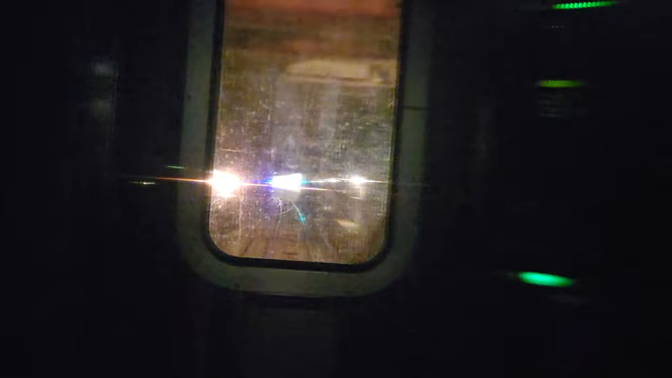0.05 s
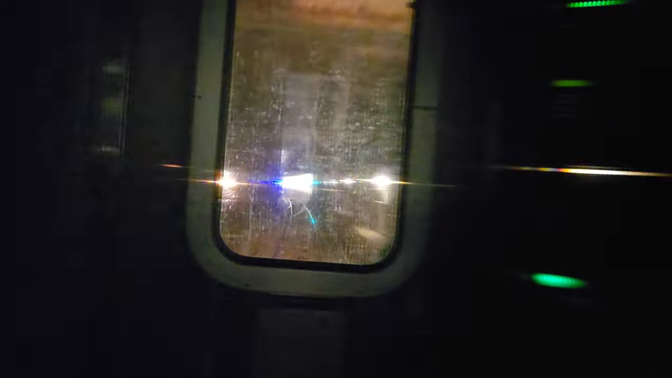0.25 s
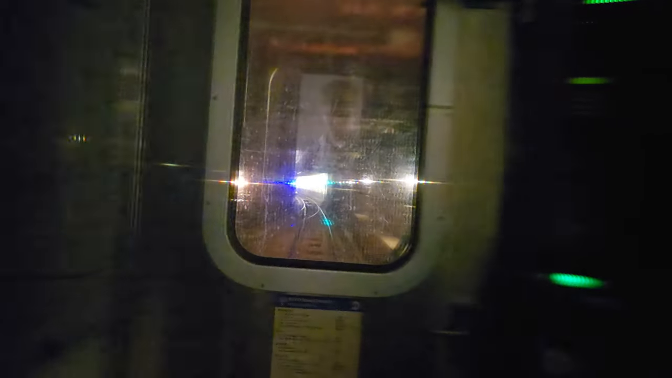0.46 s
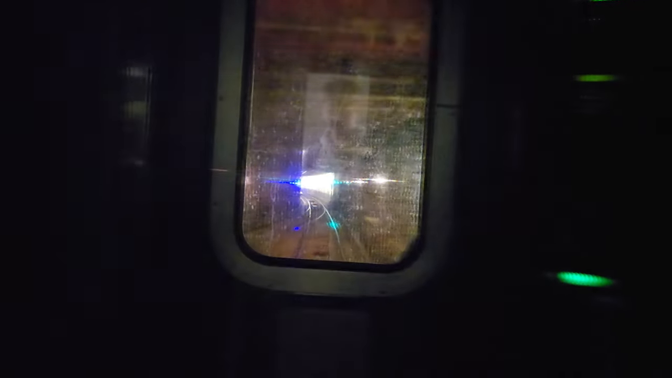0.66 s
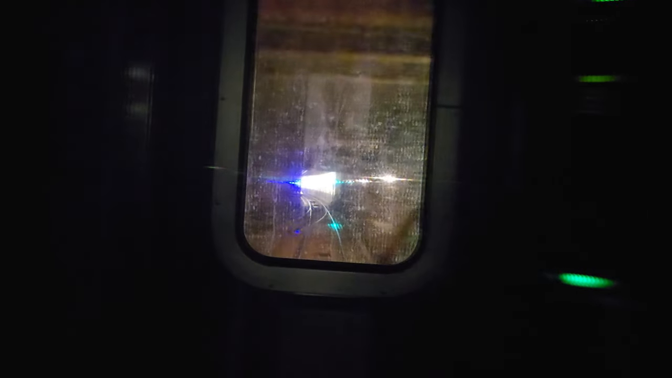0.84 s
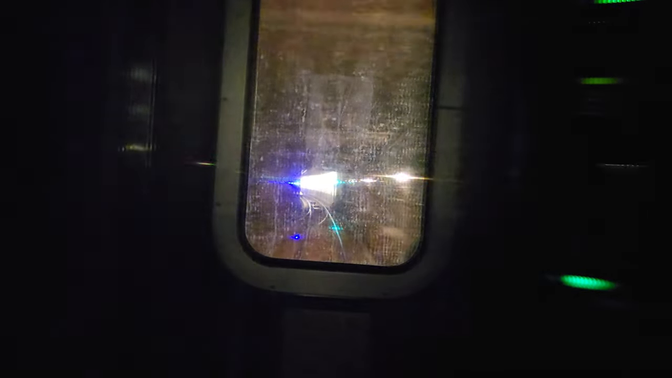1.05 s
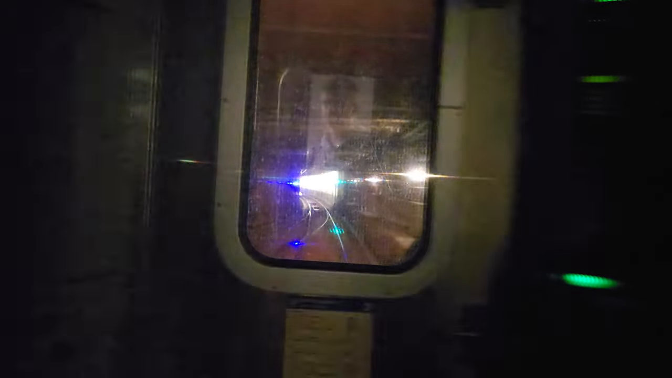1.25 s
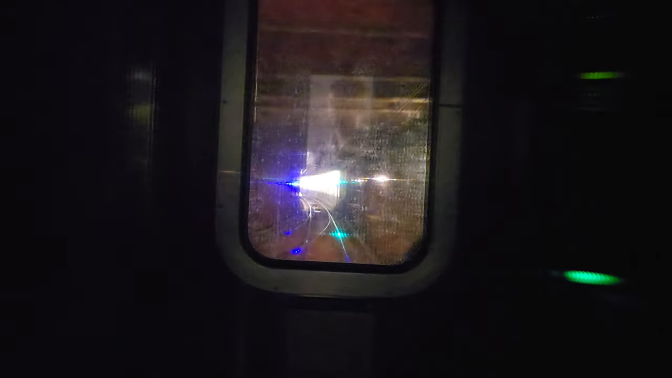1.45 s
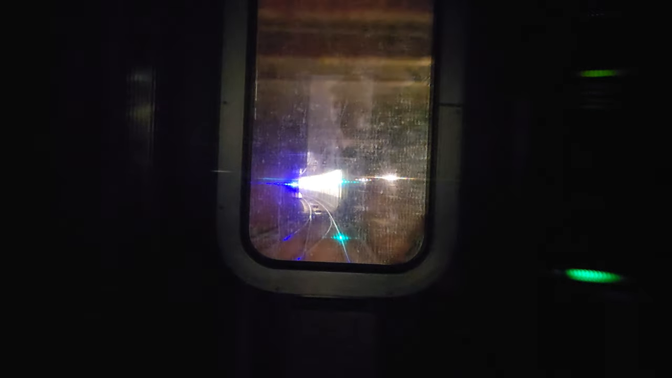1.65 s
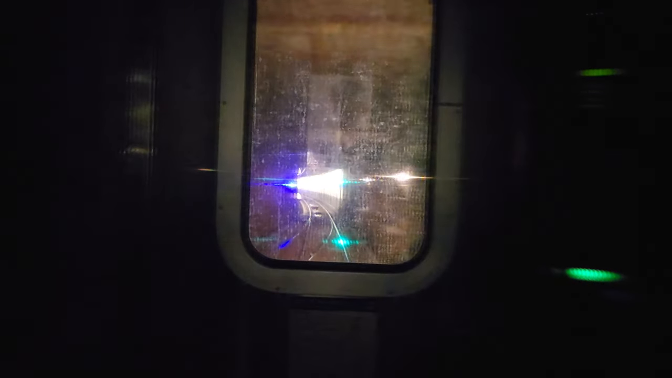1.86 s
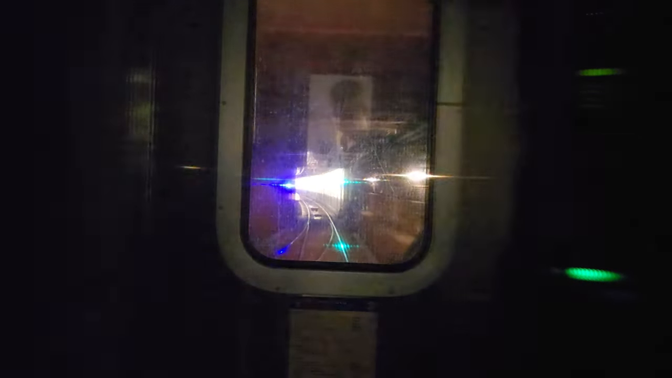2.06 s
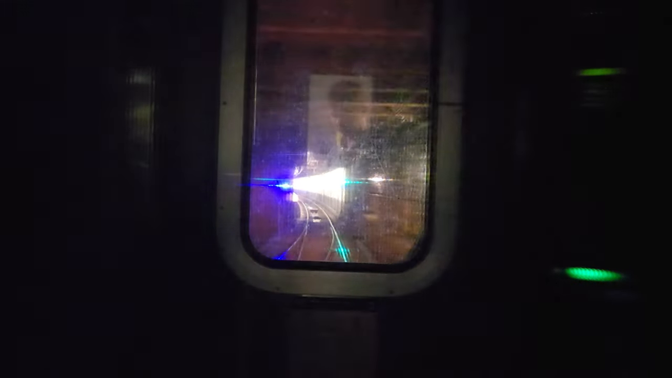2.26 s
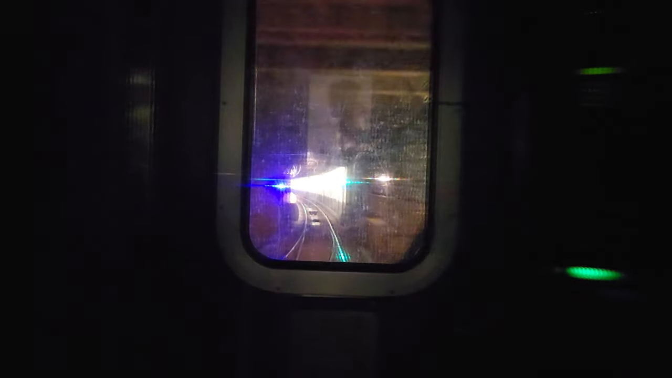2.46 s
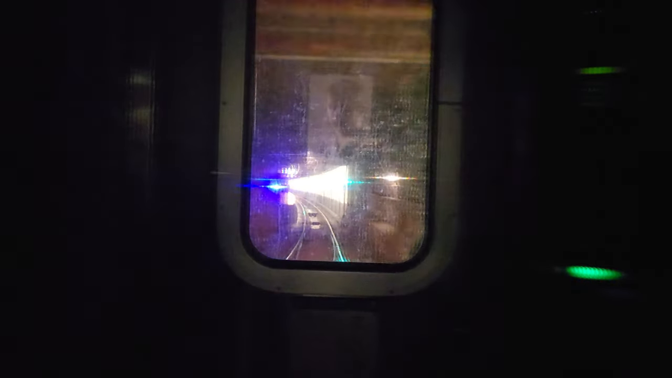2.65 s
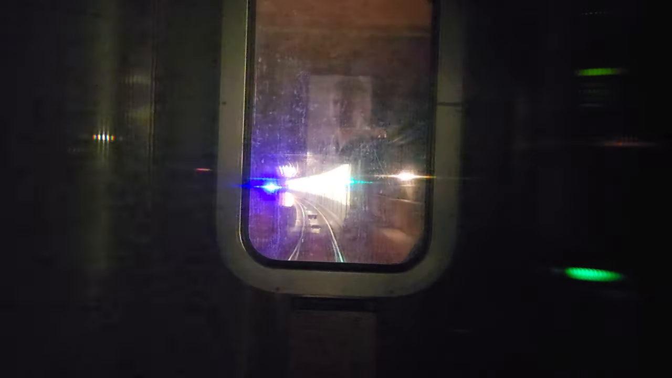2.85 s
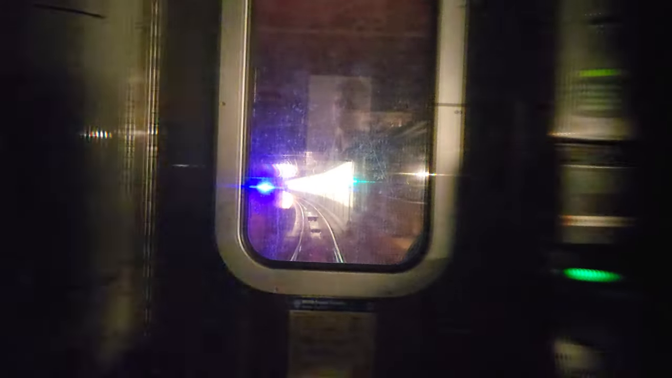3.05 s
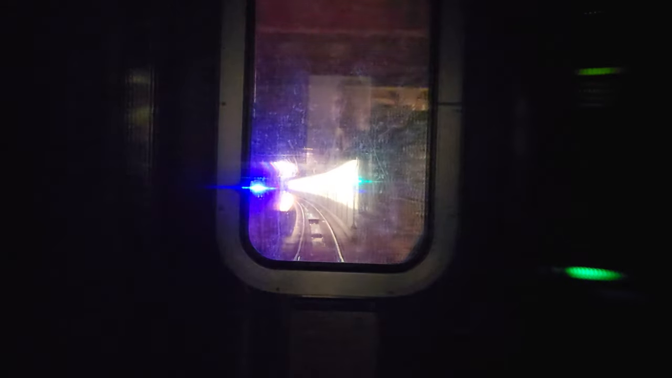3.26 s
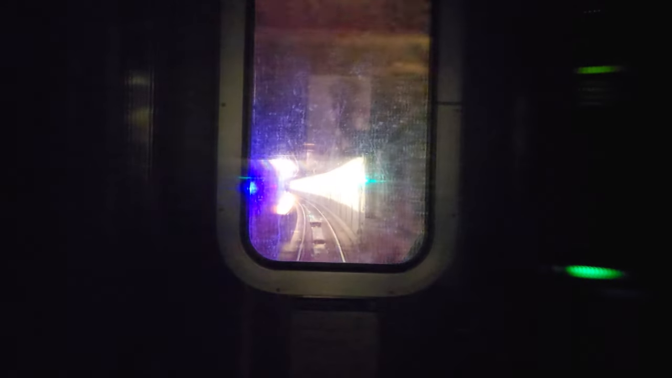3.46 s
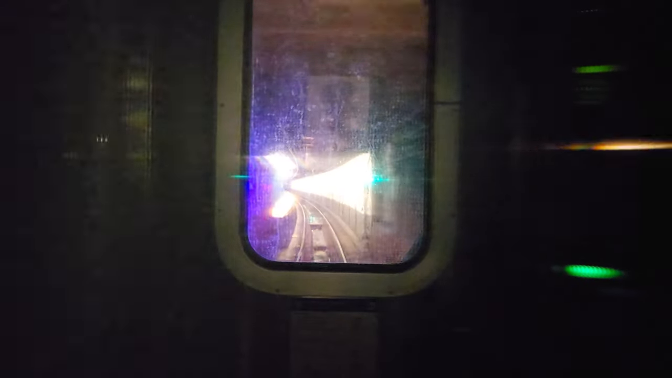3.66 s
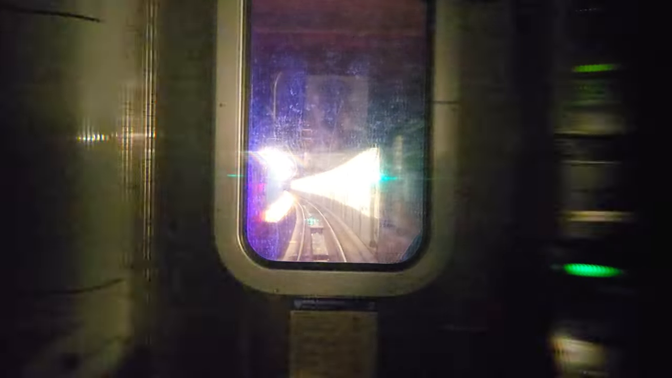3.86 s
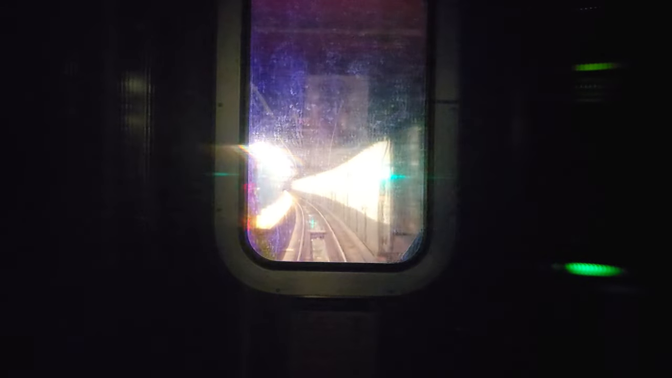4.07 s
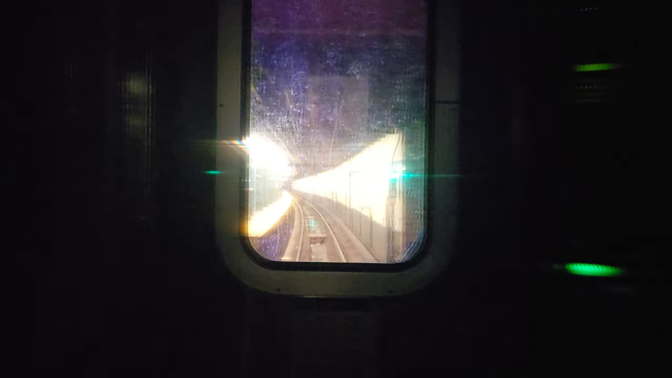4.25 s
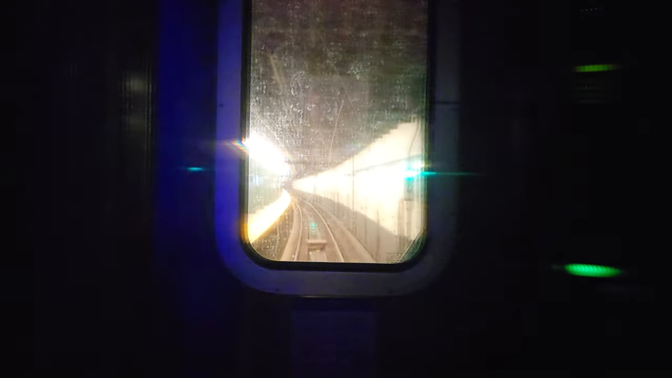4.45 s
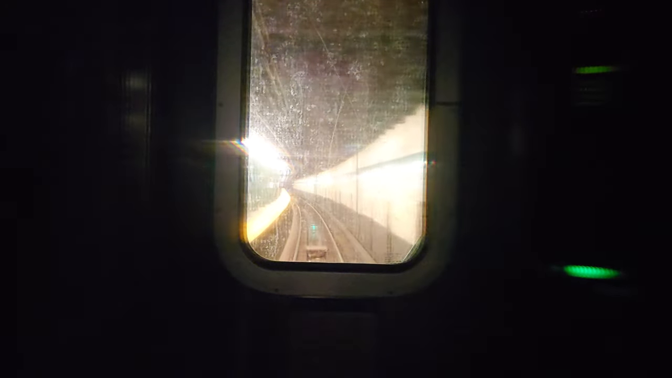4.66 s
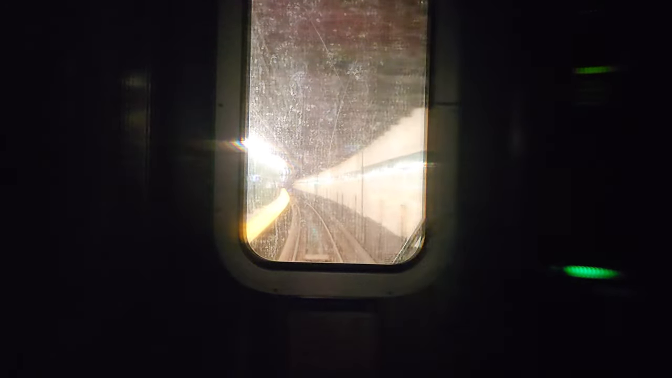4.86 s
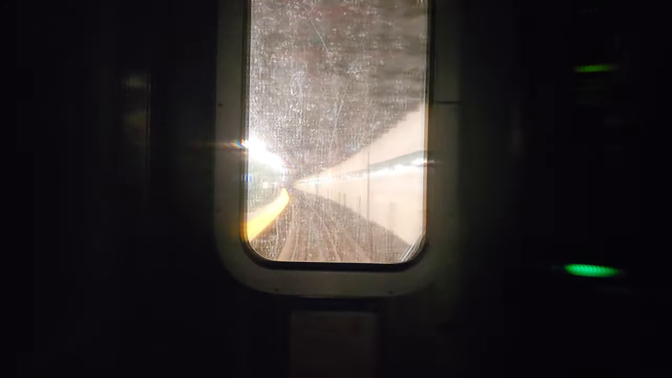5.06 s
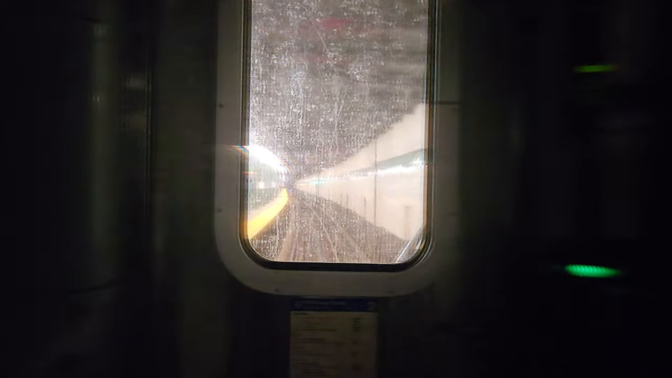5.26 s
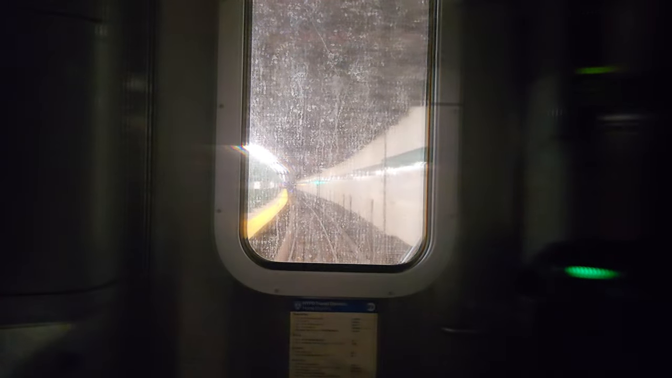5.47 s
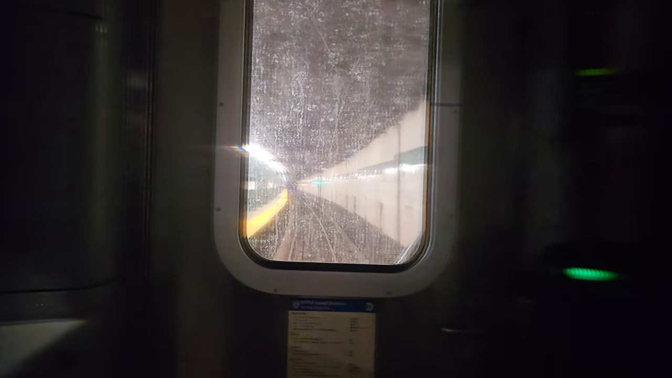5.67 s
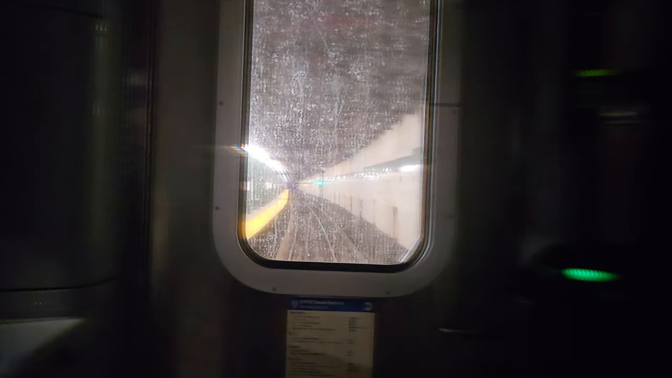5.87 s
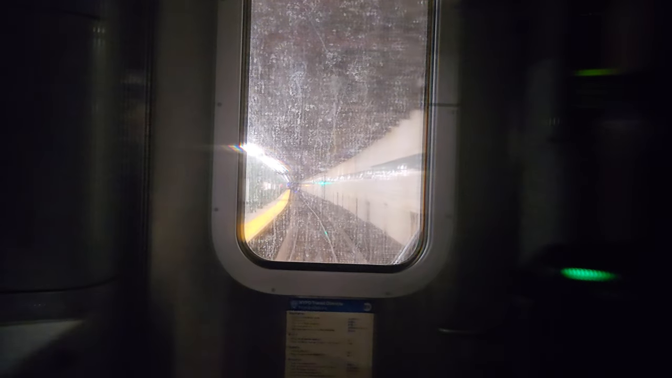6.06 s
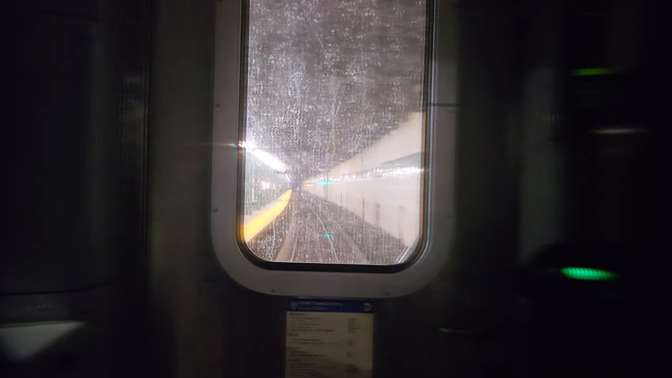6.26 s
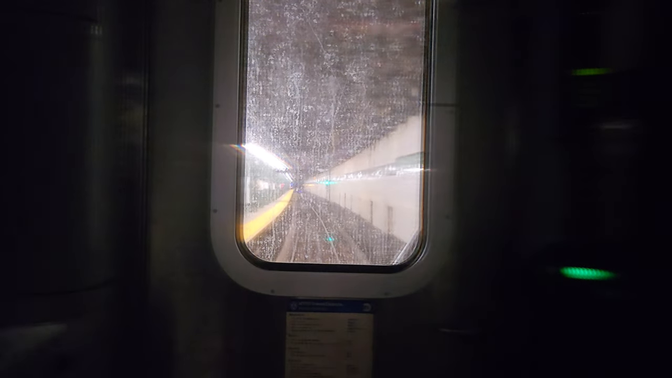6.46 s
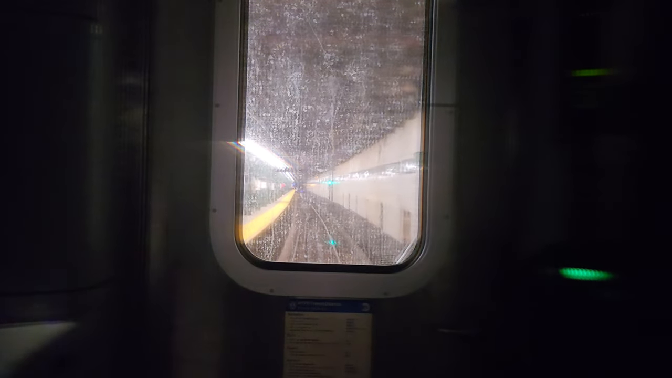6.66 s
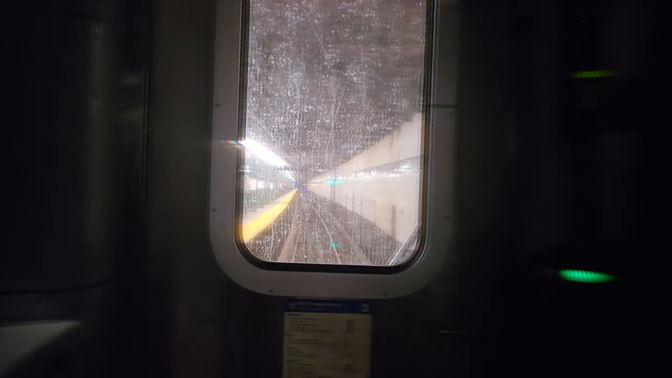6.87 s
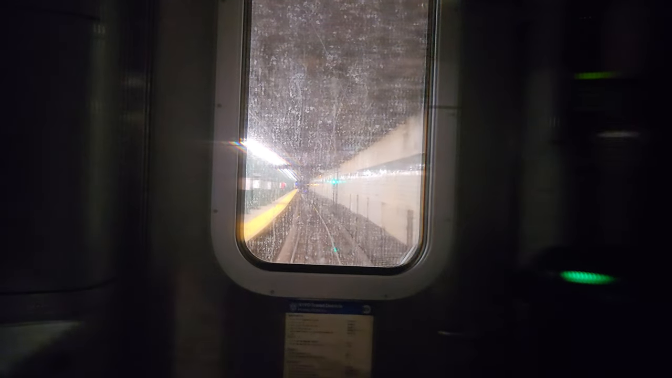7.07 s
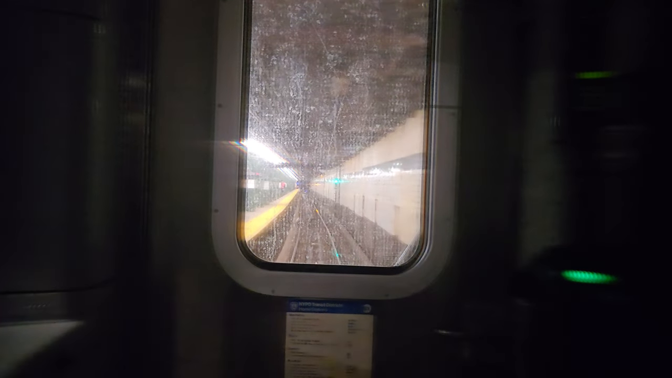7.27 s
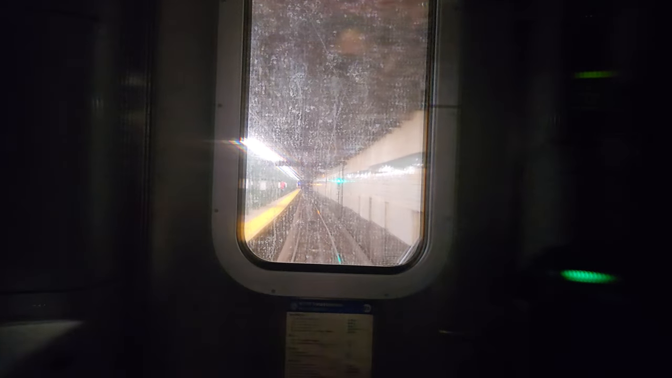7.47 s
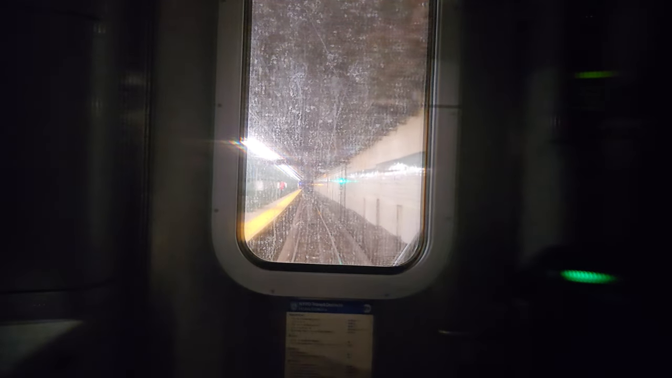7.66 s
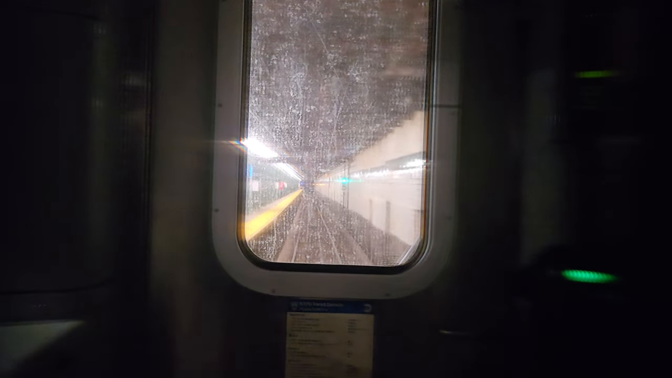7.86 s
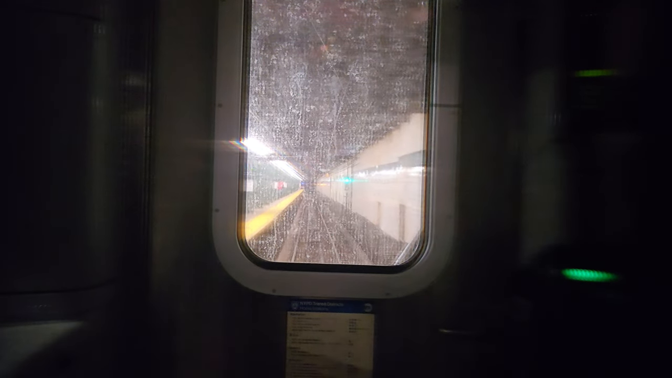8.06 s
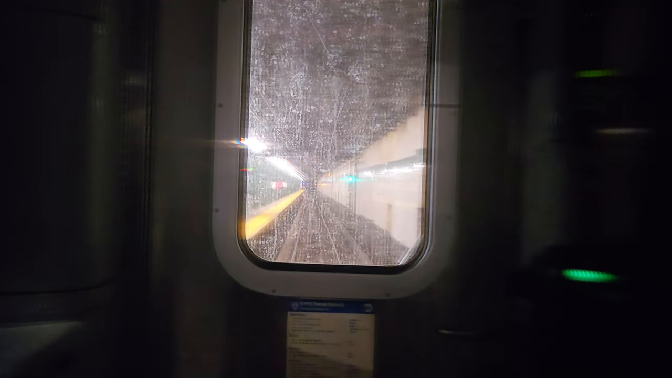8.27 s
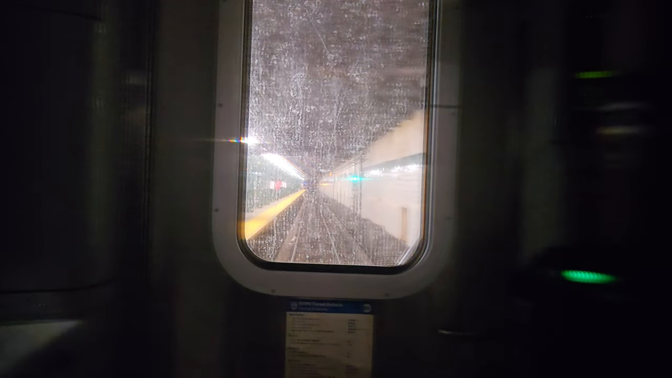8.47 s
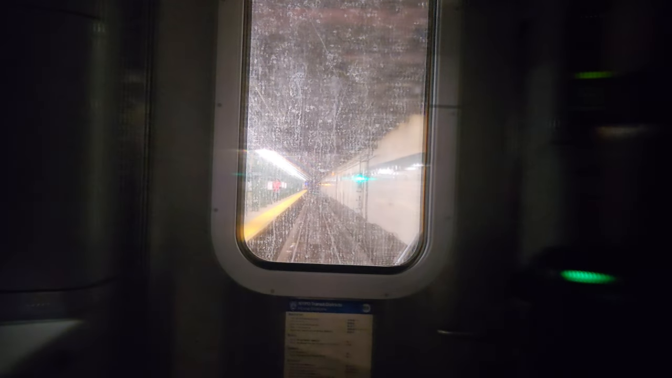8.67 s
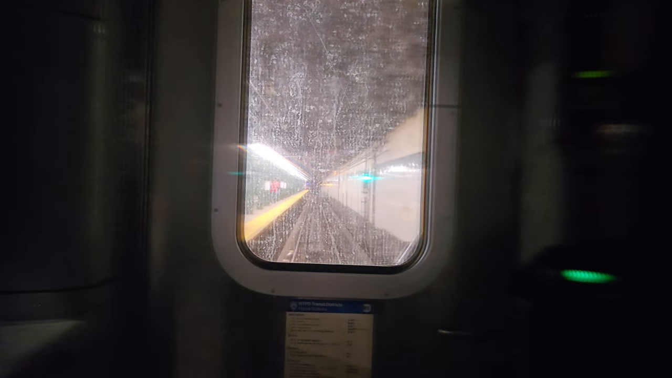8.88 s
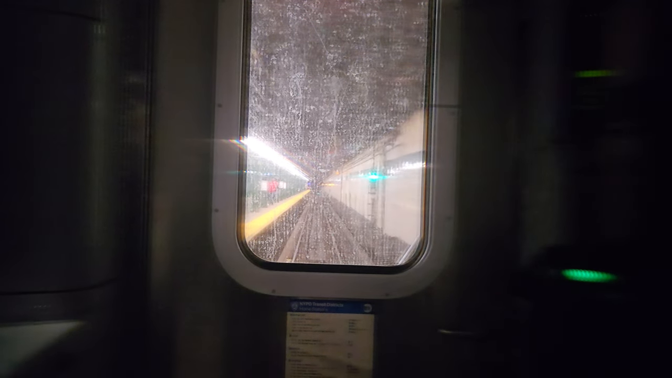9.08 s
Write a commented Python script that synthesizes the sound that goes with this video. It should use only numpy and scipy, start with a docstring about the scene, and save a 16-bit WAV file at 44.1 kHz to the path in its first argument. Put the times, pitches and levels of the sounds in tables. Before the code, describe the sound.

After a short silence, the sound of a subway car running through a tunnel starts abruptly at about 0.6 seconds, heard from inside on a hand-held phone. A low, throbbing rumble of wheels on rail continues throughout, with rattling fittings and irregular dull thumps under the floor. Sharp rail joint clacks and brief high squeaks come around 0.7 and 1 second. Deep booms follow from 2 to 2.6 seconds, then more clacks, short hisses and a swell of roar around 3 seconds. From about 3.5 seconds the clatter drops as the train slows into a station. Heavier thumps land near 4.3 and 5 seconds, and the rumble goes on more softly, with light clacks and faint squeaks near 6.7 seconds. The rattle flares at 8.2 seconds, with a loud clack at 8.4, and the rumble lasts until about 9 seconds. Tiny high ticks and the squeaks sit mostly left.

```python
"""Inside a subway car leaving a tunnel and slowing into a station, on a hand-held phone.
Rough wheels on rough rail shake the body, the bogie and the cabin air, and fittings clatter.
Under the floor the bogie thumps over dips and rail joints clack. The hiss swells, flanges squeak
briefly, tiny ticks ring high up. Sound reaches the left microphone port just before the right."""
import sys
import numpy as np
from scipy import signal
from scipy.fft import rfft, irfft, next_fast_len
from scipy.io import wavfile
from scipy.ndimage import uniform_filter1d

SR = 44100
rng = np.random.default_rng(int(sys.argv[2]) if len(sys.argv) > 2 else 0)


def transcribe(u):
    """Save the signal u as a 16-bit wav file named by the first command-line argument.

    u: samples, shape (n,) or (channels, n), limited to [-1, 1]; the rate is SR.
    q: integer samples, one column per channel.
    """
    v = np.clip(np.atleast_2d(u).T, -1, 1)
    q = np.round(v * 32767).astype(np.int16)
    wavfile.write(sys.argv[1], SR, q)


N = 402191

# borders of the rolling layers, from boom up to hiss: edge_hz
LAYER_EDGES = [15, 70, 140, 260, 470, 630, 900, 1700, 3400, 5800, 10000, 17000]
# spectra of the rumble and of the rattle above it, at the phone: frequency_hz, density_db
RUMBLE_COLOUR = [(12, -36), (22, -8.5), (34, 0), (52, -0.5), (75, -4.5), (95, 1), (125, -5.5), (165, -5.5),
                 (290, -4.5), (390, -5), (500, -11.5), (640, -16), (800, -17.5), (1000, -18)]
RATTLE_COLOUR = [(900, 8), (1440, 5), (1740, 2), (3150, 3), (3400, -7.5), (5500, -17), (5800, -26.5),
                 (6900, -30), (9300, -32.5), (9900, -37), (11300, -30), (12000, -32), (13300, -32),
                 (15700, -30.5)]
# the roar leans from side to side: time_s, left_minus_right_db
ROAR_LEAN = [(.65, 2.3), (2.2, 1), (4.3, 1), (5.1, -3.5), (6.2, 1.5), (7.8, -1.8), (9.12, 1)]


def rolling(crossover_hz=950, overlap_octaves=.16, ring_rest_db=-9):
    """Rough wheels on rough rail excite each layer; bands flicker alone, jolts shake all the treble."""
    size = next_fast_len(N)
    hz, noise = port_noise(size)
    join_db = along(RUMBLE_COLOUR, crossover_hz) - along(RATTLE_COLOUR, crossover_hz)
    colour_db = np.where(hz < crossover_hz, along(RUMBLE_COLOUR, hz), along(RATTLE_COLOUR, hz) + join_db)
    noise = noise * undb(colour_db)
    lean = undb(np.outer([.5, -.5], curves(ROAR_LEAN)[0]))
    jolt = wobble(spread_db=1, rate_hz=14)
    octave, out = np.log2(hz + 1e-9), 0
    for db, lo_hz, hi_hz in zip(layer_levels(), LAYER_EDGES, LAYER_EDGES[1:]):
        edges = np.linspace(np.log2(lo_hz), np.log2(hi_hz), num=3)
        layer = 0
        for lo, hi in zip(edges, edges[1:]):
            inside = np.minimum(octave - lo, hi - octave) / overlap_octaves
            mask = np.sin(np.pi / 2 * np.clip(.5 + inside, 0, 1))  # bands cross with constant power
            band = irfft(noise * mask, size)[:, :N]
            layer = layer + band * wobble(spread_db=.5, rate_hz=9)
        # each mode mostly rests and now and then rings up
        layer = steel_ring(layer, lo_hz, hi_hz,
                           lambda: undb(ring_rest_db) * wobble(spread_db=3, rate_hz=14))
        if lo_hz < 900:
            layer = layer * wobble(spread_db=1.3, rate_hz=11)  # the rumble throbs
        else:
            layer = layer * jolt
        if 140 <= lo_hz < 470:
            layer = layer * lean
        out = out + unit(layer) * undb(db)
    return out


# car body and bogie, through the floor: time_s, boom_db, thud_db
FLOOR = [(0.65, -47, -27), (0.98, -18.5, -29.5), (1.64, -37.5, -33.5), (1.95, -31, -36), (1.99, -15.5, -32),
         (2.47, -13.5, -29), (2.54, -26, -43), (2.6, -15.5, -29), (3.17, -22, -16.5), (3.48, -23, -21),
         (3.6, -35, -40), (3.79, -20, -27), (3.95, -39, -33), (4.26, -33, -26), (4.28, -24.5, -19.5),
         (4.97, -21, -24), (5.11, -27, -52), (5.13, -37, -44), (5.39, -29, -38), (5.44, -21, -29.5),
         (6.62, -26.5, -30), (7.14, -21.5, -34.5), (9.03, -21, -31.5), (9.12, -21, -38)]
# cabin air and panels, all around the phone: time_s, roar_db, rail_hum_db, whirr_db
CABIN = [(0.65, -16, -26, -29), (1.1, -17.5, -24, -28.5), (2.47, -18, -28.5, -32.5), (3.08, -11, -25, -34),
         (3.55, -20, -39, -43), (4.07, -27.5, -39, -53), (4.09, -22.5, -47, -47), (4.23, -23.5, -41, -44),
         (4.28, -20.5, -37, -44), (4.54, -19, -35, -44.5), (4.59, -17.5, -31, -38), (4.82, -16.5, -36, -41),
         (5.11, -25.5, -40.5, -48), (5.65, -23, -40.5, -47.5), (5.84, -21.5, -31.5, -46.5),
         (6.19, -26.5, -34, -38.5), (7.35, -22.5, -37.5, -46), (7.47, -19.5, -36, -40),
         (8.1, -24, -38, -42), (8.44, -16, -34, -33.5), (8.55, -22.5, -44, -36.5),
         (8.69, -19.5, -39, -41.5), (9.1, -21.5, -37.5, -39), (9.12, -26, -34.5, -36)]
# rattle through doors and windows: time_s, clatter_db, relative_grind_db, relative_brightness_db
RATTLE = [(0.65, -34, 2.5, -3), (0.79, -31, -3, -7.5), (0.95, -34.5, -0.5, -4.5), (1.0, -37, -3, -4),
          (1.03, -27.5, -8, -5.5), (1.14, -30, -4, -7), (1.76, -34.5, -0.5, -9.5), (1.97, -35.5, 0.5, -7),
          (2.82, -35, 0, -7), (3.03, -27, -3.5, -5.5), (3.06, -28.5, -2, -5), (3.64, -46, 0, -7),
          (4.07, -44, -3.5, -7.5), (4.31, -41.5, 2, -6.5), (4.5, -47, 5.5, -7.5), (4.97, -37, -4.5, -6.5),
          (5.11, -47, 0.5, -10.5), (5.37, -43, -2, -7.5), (5.51, -48, -1, -5.5), (5.86, -39.5, -1.5, -7),
          (6.19, -42.5, 1, -8), (6.83, -41, -2, -7), (6.92, -45, -0.5, -7), (8.17, -42, 0.5, -8.5),
          (8.22, -32, -4.5, -9), (8.34, -37, -2, -8.5), (8.39, -32, 2, 0), (8.5, -38, 0, -10),
          (9.05, -44, 3.5, -6), (9.12, -40.5, 5, -9)]


def layer_levels():
    """How hard body, cabin and fittings shake: one dB curve a layer, from boom up to hiss."""
    boom, thud = curves(FLOOR)
    roar, hum, whirr = curves(CABIN)
    clatter, grind, brightness = curves(RATTLE)
    jingle = clatter + 1.23 * brightness + .5
    sizzle = clatter + brightness - 11.5
    hiss = clatter + .94 * brightness - 20.5
    return [boom, thud, roar - 4.5, roar - 1.5, hum, whirr, clatter + grind, clatter, jingle, sizzle, hiss]


# modes of wheel, rail and bogie, below the car: pitch_hz, width_hz, level_db
STEEL_MODES = [(301, 43, 4.5), (401, 21, 5.5), (1058, 75, 8.5), (1447, 170, 8), (2030, 280, 6),
               (3645, 86, 4), (4010, 240, 5.5), (4880, 130, 5.5), (5330, 120, -1), (6350, 140, 3.5),
               (7220, 200, 3), (8430, 160, 3.5), (12060, 350, 9), (14400, 160, -1)]


def steel_ring(shaking, lo_hz, hi_hz, excitation):
    """Shaken steel adds its modes between two frequencies, each as strongly as excitation() says."""
    out = shaking
    for hz, width_hz, db in STEEL_MODES:
        if lo_hz <= hz < hi_hz:
            mode = signal.lfilter(*signal.iirpeak(hz, hz / width_hz, SR), shaking)
            out = out + undb(db) * excitation() * mode
    return out


# dips in the track, underfoot: start_s, level_db, pitch_hz, t60_s
TRACK_DIPS = [(0.734, -4, 377, 0.35), (1.226, -1.5, 410, 0.32), (1.299, -8, 412, 0.35),
              (1.469, -4.5, 342, 0.27), (1.713, -9, 343, 0.26), (1.879, -7, 310, 0.32),
              (2.049, -7.5, 176, 0.37), (2.499, -8, 378, 0.41), (2.649, -9.5, 220, 0.33),
              (2.779, -3.5, 368, 0.35), (3.169, -17, 312, 0.31), (3.269, -13, 72.7, 0.31),
              (3.789, -11, 218, 0.35), (4.09, -10, 334, 0.4), (4.268, -6.5, 357, 0.35), (4.3, -1, 93, 0.31),
              (4.421, -10, 72.7, 0.24), (4.57, -10, 265, 0.35), (4.709, -7, 357, 0.42),
              (4.941, -7.5, 86.1, 0.35), (5.191, -10, 296, 0.39), (5.549, -18, 207, 0.35),
              (5.705, -9.5, 337, 0.31), (5.819, -14, 299, 0.31), (6.42, -21, 250, 0.35),
              (6.747, -12.5, 236, 0.35), (7.089, -13.5, 72, 0.47), (7.289, -10, 71, 0.38),
              (7.489, -10.5, 72.7, 0.4), (7.719, -8, 343, 0.3), (8.219, -12.5, 364, 0.35),
              (8.389, -10, 380, 0.33), (8.738, -12, 362, 0.38)]


def bogie_thumps(gain_db=-6, rise_s=.004, relative_width=.17):
    """The bogie drops through a dip and shakes the floor around one low pitch for a moment."""
    out, t = np.zeros((2, N)), np.arange(SR // 3) / SR
    for start_s, db, pitch_hz, t60 in TRACK_DIPS:
        envelope = (1 - np.exp(-t / rise_s)) * undb(-60 * t / t60)
        hz, noise = port_noise(len(t))
        resonance = 1 / (1 + ((hz - pitch_hz) / (relative_width * pitch_hz)) ** 2)
        thump = unit(irfft(noise * resonance, len(t))) * envelope
        add(out, start_s - rise_s, thump * undb(db + gain_db))
    return out


# rail joints under a wheel: start_s, level_db, t60_s, tilt_db_per_octave
RAIL_JOINTS = [(0.7382, -22, 0.31, -0.5), (1.0087, -18.5, 0.16, 0.5), (2.6504, -29, 0.18, 5),
               (2.8734, -28, 0.36, -3), (2.9794, -25, 0.42, 4.5), (3.8994, -42, 0.47, 3),
               (4.2794, -31, 0.35, -5), (4.5784, -38, 0.43, 3), (4.9018, -32.5, 0.4, 1),
               (5.3408, -32, 0.22, -5), (5.6694, -39, 0.28, 1), (6.3394, -37, 0.18, 5),
               (6.4897, -32.5, 0.41, -0.5), (6.7684, -34.5, 0.52, -1), (6.907, -39, 0.29, 2),
               (7.6994, -35, 0.84, -3), (7.9997, -40, 0.21, 8), (8.08, -40, 0.27, -8),
               (8.207, -29.5, 0.82, 1.5), (8.3739, -17.5, 0.45, 1.5), (8.6792, -29, 0.19, -2.5)]
# spectrum of a clack from inside the car: frequency_hz, density_db
CLACK_COLOUR = [(290, -29), (500, 7), (667, -29), (793, 21), (971, -30), (1310, 2), (1800, -13), (2950, 7),
                (4480, -15), (4880, -11), (15700, -41)]


def joint_clacks(gain_db=-8, rise_s=.002, ring_db=6, chatter_db=1):
    """Each joint sets bogie and panels chattering and ringing; this dies in the tunnel and the car."""
    out, t = np.zeros((2, N)), np.arange(SR // 3) / SR
    for start_s, db, t60, tilt in RAIL_JOINTS:
        hz, noise = port_noise(len(t))
        colour_db = along(CLACK_COLOUR, hz) + tilt * np.log2(np.clip(hz, 500, 16000) / 3000)
        envelope = (1 - np.exp(-t / rise_s)) * undb(-60 * t / t60)
        rebounds = flutter(chatter_db, len(t))  # loose parts bounce every few milliseconds
        rattle = unit(irfft(noise * undb(colour_db), len(t)) * rebounds) * envelope
        clack = steel_ring(rattle, 900, SR, lambda: undb(ring_db - rng.standard_normal()))
        add(out, start_s - .003, clack * undb(db + gain_db))
    return out


# brief swells of treble hiss in the car: start_s, length_s, level_db, centre_hz
HISS_SWELLS = [(.74, .12, -43, 5000), (.88, .09, -59, 8000), (1.14, .06, -57, 14500),
               (1.23, .07, -56, 14000), (1.42, .06, -56, 7000), (2.031, 0.12, -54, 8000),
               (2.195, .1, -44.5, 4930), (2.58, 0.09, -52, 13000), (2.878, .1, -32, 2500),
               (2.975, 0.11, -33, 3980), (3.083, 0.36, -47, 5860), (3.503, .1, -62, 13500),
               (3.5, 0.12, -58, 5000), (3.88, .13, -68, 8000), (4.08, .15, -62, 7500),
               (4.27, .1, -62, 7500), (4.575, 0.13, -64, 10000), (4.72, 0.28, -57, 8040),
               (5.2, .2, -62, 6500), (5.783, 0.11, -60, 8000), (6.033, 0.11, -59, 13500),
               (6.327, .07, -59, 6500), (6.49, .06, -65, 6000), (6.6, .1, -56, 7500),
               (6.76, 0.11, -56, 7500), (6.974, 0.18, -60, 13500), (7.048, 0.12, -56, 7500),
               (7.417, 0.088, -47.5, 3470), (7.702, 0.089, -51, 3500), (8.0, 0.077, -60, 13500),
               (8.5, .12, -64, 13000), (8.68, 0.071, -48, 3520), (8.927, .08, -46, 3200)]


def hiss_swells(grit_db=2, relative_width=.3, rise_share=.24):
    """A gritty band of hiss rises quickly and fades, all within a third of a second."""
    out, size = np.zeros((2, N)), SR // 3
    for start_s, length_s, db, centre_hz in HISS_SWELLS:
        hz, noise = port_noise(size)
        band = np.exp(-((hz - centre_hz) / (relative_width * centre_hz)) ** 2)
        hiss = unit(irfft(noise * band)) * flutter(grit_db, size)
        n = min(int(length_s * SR), size)
        envelope = np.sin(np.pi / 2 * np.interp(np.arange(n) / n, [0, rise_share, 1], [0, 1, 0]))
        add(out, start_s, hiss[:, :n] * envelope * undb(db))
    return out


# steel on steel, mostly left of the phone; more scrape smears the note:
# start_s, length_s, start_hz, end_hz, level_db, left_minus_right_db, scrape
SQUEAKS = [(0.736, 0.16, 4080, 4040, -37.5, -4, 6), (.9, 0.067, 7450, 7500, -49, -2, 5),
           (0.89, 0.13, 3050, 3160, -34.5, 3, 4), (1.028, 0.038, 3150, 3030, -24, 3, 1.8),
           (1.94, 0.06, 5390, 5380, -49, 10, 2.6), (1.993, .04, 4320, 4300, -43, 3, 1.5),
           (2.605, .03, 14420, 14420, -54, -2, 1.5), (2.98, .05, 12300, 12200, -54, 8, 4.3),
           (3.105, .08, 7580, 7500, -52, 9, 1.5), (3.17, 0.11, 11930, 11930, -59, 4, 1.5),
           (3.934, .06, 4300, 4300, -55, 5, 1.5), (4.13, .1, 7300, 7400, -60, 12, 5),
           (4.287, .03, 7260, 7300, -56, 10, 4), (4.488, 0.15, 4180, 4140, -55, 16, 1.2),
           (4.77, .05, 6550, 6460, -58, 14, 1.5), (4.96, .08, 7760, 7710, -62, 12, .6),
           (5.13, .04, 4720, 4700, -58, 11, .7), (5.878, 0.044, 3540, 3570, -49, 7, .8),
           (6.567, .07, 3600, 3630, -49, -1, .8), (6.637, .04, 3950, 3970, -44, 3, 1.2),
           (6.737, 0.04, 7450, 7450, -55, 6, 2.5), (6.796, 0.09, 4200, 4130, -43.5, 6, 1.1),
           (7.05, 0.12, 3200, 3200, -52, 5, .6), (7.225, .05, 14420, 14420, -63, 12, .8),
           (8.305, .01, 14420, 14420, -58, 12, .8), (8.322, .013, 14420, 14420, -49, 16, .8)]


def flange_squeaks(waver=.004, roughness=.52, fade=1.2):
    """A flange or fitting slips and sings one wavering note that peaks early and trails off."""
    out = np.zeros((2, N))
    for start_s, length_s, start_hz, end_hz, db, pan_db, scrape in SQUEAKS:
        n = int(length_s * SR)
        drift, grit = 10 * uniform_filter1d(rng.standard_normal((2, SR // 5)), size=100)[:, :n]
        pitch_hz = np.linspace(start_hz, end_hz, n) * (1 + waver * scrape * drift)
        tone = np.sin(2 * np.pi * np.cumsum(pitch_hz) / SR)
        envelope = 2 * signal.windows.tukey(n, .4) * np.exp(-fade * np.arange(n) / n)
        add(out, start_s, pan(tone * envelope * (1 + roughness * grit), db, pan_db))
    return out


# tiny hard taps, mostly left of the phone: start_s, level_db, left_minus_right_db
TICKS = [(1.1578, -40, 6.0), (1.2521, -37, -9), (1.6062, -35, 13), (1.6224, -49, 9.5), (1.6327, -39, 18),
         (1.6434, -42, 10.5), (1.6614, -46, 5.0), (1.7714, -46, -1.0), (1.8148, -39, 0.0), (2.7317, -42, 0),
         (3.5194, -46, 10.0), (5.0644, -49, 7.0), (7.2504, -53, 4.5), (7.9573, -42, -1), (8.1668, -48, 9.5),
         (8.323, -43, 18.5)]
# modes of the tapping part: pitch_hz, level_db, t60_s
TICK_MODES = [(9300, -9, .005), (12200, -3, .006), (13400, -6, .003), (14400, 0, .009), (15300, -2, .005)]


def ticks(gain_db=-1, spread_db=3, rise_s=.0002):
    """A small hard part taps and rings for a few milliseconds, its modes in a new balance each time."""
    out, t = np.zeros((2, N)), np.arange(SR // 25) / SR
    attack = 1 - np.exp(-t / rise_s)
    for start_s, db, pan_db in TICKS:
        ring = 0
        for hz, mode_db, t60 in TICK_MODES:
            struck_db = mode_db + spread_db * rng.standard_normal()
            ring = ring + undb(struck_db - 60 * t / t60) * np.sin(2 * np.pi * hz * t)
        add(out, start_s, pan(ring * attack, db + gain_db, pan_db))
    return out


# likeness of the phone's two microphone ports: frequency_hz, correlation
PORT_LIKENESS = [(30, 1), (200, 0.94), (380, 0.87), (600, 0.44), (1200, 0.31), (3000, 0), (9000, 0),
                 (15000, 0.03)]
# their balance: frequency_hz, left_minus_right_db
PORT_BALANCE = [(60, -0.5), (110, -2.2), (200, 1.1), (380, -5), (700, -0.5), (1290, 3.0), (2380, 8),
                (4400, 5.5), (8120, 8.5), (15000, 0.5)]
# lag of the right port: frequency_hz, phase_rad
PORT_LAG = [(0, 0.5), (250, -0.11), (430, 0.98), (780, 2.5), (1890, 6), (16000, 46.5)]


def port_noise(size):
    """Frequencies and noise spectra at the two ports: partly shared, unequal, late on the right."""
    hz = np.fft.rfftfreq(size, 1 / SR)
    left, unshared = rfft(rng.standard_normal((2, size)))
    likeness = along(PORT_LIKENESS, hz)
    lag_rad = np.interp(hz, *np.transpose(PORT_LAG))
    right = (likeness * left + np.sqrt(1 - likeness ** 2) * unshared) * np.exp(-1j * lag_rad)
    return hz, np.array([left, right]) * undb(np.outer([.5, -.5], along(PORT_BALANCE, hz)))


def wobble(spread_db, rate_hz):
    """A gain that wanders between random levels."""
    knots = np.arange(0, N + SR, SR / rate_hz)
    return np.interp(np.arange(N), knots, undb(spread_db * rng.standard_normal(1000)[:len(knots)]))


def flutter(spread_db, size):
    """A gain that jumps to a random level every 100 samples."""
    return np.repeat(undb(spread_db * rng.standard_normal(size // 100)), 100)


def undb(db):
    """Gain of a level in dB."""
    return 10 ** (np.asarray(db) / 20)


def along(table, hz):
    """Read a (frequency_hz, value) table on a log-frequency axis."""
    table_hz, values = np.transpose(table)
    return np.interp(np.log(hz + 1e-9), np.log(table_hz), values)


def curves(table):
    """Columns of a timed table as sample-rate curves."""
    time_s, *columns = np.transpose(table)
    return [np.interp(np.arange(N) / SR, time_s, column) for column in columns]


def unit(sound):
    """Scale a stereo sound so that its middle has rms 1."""
    return sound / np.sqrt(np.mean(sound.mean(axis=0) ** 2))


def pan(mono, db, pan_db):
    """Place a sound in stereo, pan_db louder on the left."""
    return np.outer(undb([db + pan_db / 2, db - pan_db / 2]), mono)


def add(out, start_s, sound):
    """Mix in a short stereo sound."""
    i = int(start_s * SR)
    out[:, i:i + sound.shape[1]] += sound[:, :N - i]


def scene():
    """Everything heard in the moving car."""
    return rolling() + bogie_thumps() + joint_clacks() + hiss_swells() + flange_squeaks() + ticks()


def record(dry):
    """The phone opens after a short silence, rounds the loudest peaks and cuts the top."""
    open_s, fade_s, ceiling, top_hz = .641, .0036, 1.05, 15780
    opened = dry * np.clip((np.arange(N) / SR - open_s) / fade_s, 0, 1)
    rounded = opened / (1 + np.abs(opened / ceiling) ** 3) ** (1 / 3)
    return signal.sosfilt(signal.ellip(10, .2, 80, top_hz, fs=SR, output="sos"), rounded)


dry = scene()
out = record(dry)
transcribe(out)
```